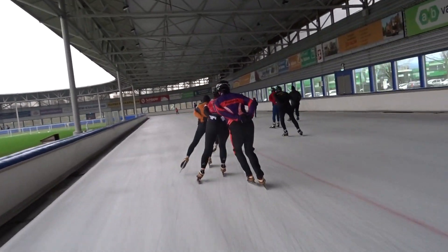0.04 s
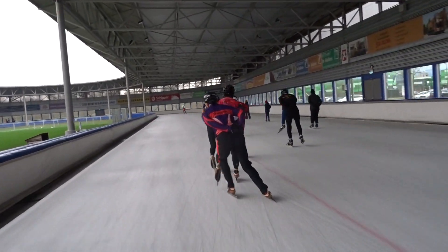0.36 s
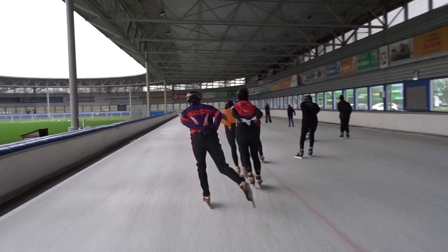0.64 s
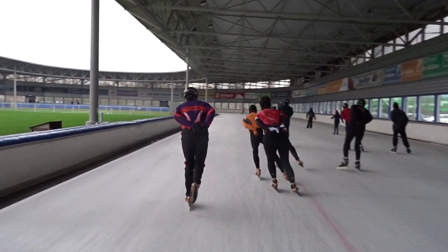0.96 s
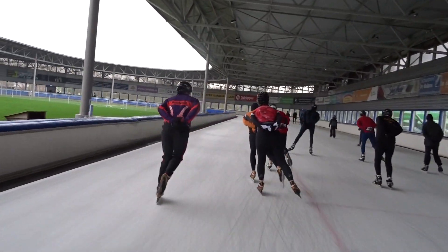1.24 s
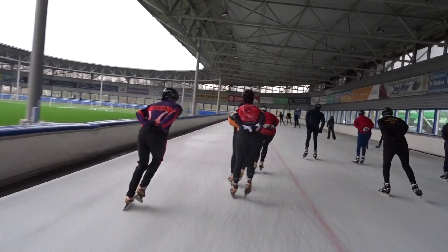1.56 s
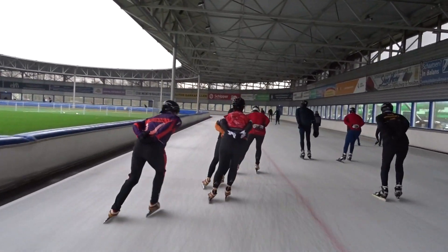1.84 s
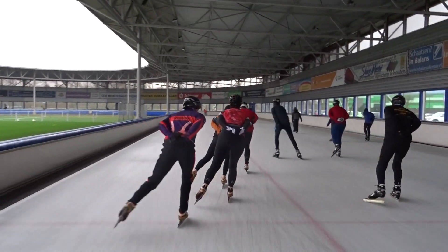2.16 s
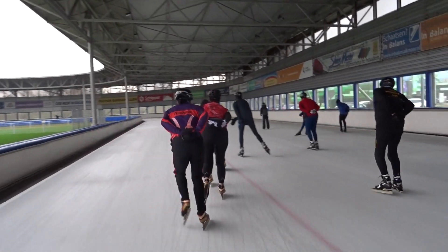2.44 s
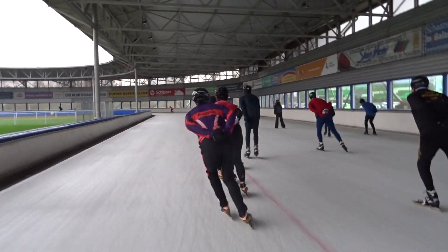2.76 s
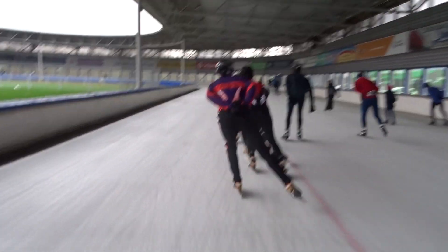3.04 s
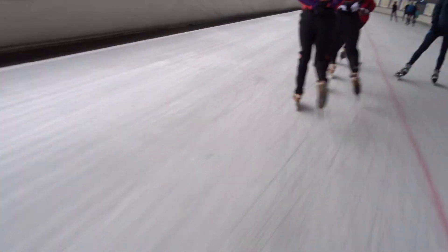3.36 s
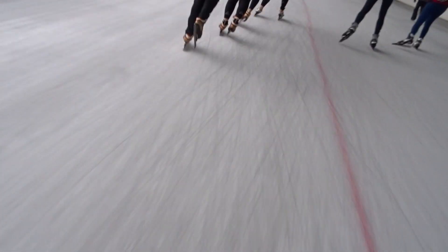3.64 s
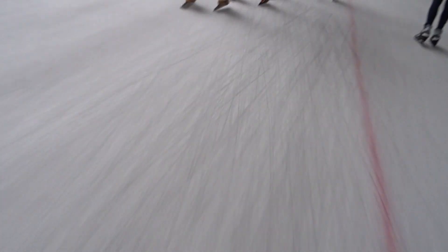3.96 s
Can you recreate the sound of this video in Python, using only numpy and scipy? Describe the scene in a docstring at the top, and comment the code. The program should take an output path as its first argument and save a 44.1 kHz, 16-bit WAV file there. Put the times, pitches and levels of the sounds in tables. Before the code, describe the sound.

Ice skate blades clack and scrape with each stride under rumbling head wind.

```python
"""A roofed ice track: speed skaters stride along, followed by a skater with a camera.
About once a second a steel blade clacks down, rings faintly off the barrier and roof, and
scrapes into its glide; edges rasp, spray and chip the ice. Head wind rumbles, flutters and
crackles on the two microphone ports, then eases and turns gusty as the camera tips down."""
import sys
import numpy as np
from scipy import signal
from scipy.fft import rfft, irfft
from scipy.io import wavfile

SR = 44100
rng = np.random.default_rng(int(sys.argv[2]) if len(sys.argv) > 2 else 0)


def int16_out(signal):
    """Quantize to a 16-bit WAV file."""
    q = np.round(np.clip(np.atleast_2d(signal).T, -1, 1) * 32767)
    wavfile.write(sys.argv[1], SR, q.astype(np.int16))


N = 176400
TIME_S, FREQ_HZ = np.arange(N) / SR, np.fft.rfftfreq(N, 1 / SR)


def amp(db):
    """Decibels to gain."""
    return 10 ** (np.asarray(db) / 20)


def unit(x):
    """Scales to rms 1."""
    return x / np.sqrt(np.mean(x ** 2) + 1e-20)


def curve_at(points, hz):
    """Reads a curve on a log-frequency axis."""
    f, value = np.transpose(points)
    return np.interp(np.log(hz + 1), np.log(f + 1), value)


def fader(points):
    """A level ride as a gain per sample."""
    return amp(np.interp(TIME_S, *np.transpose(points)))


def wobble(rate_hz):
    """Random movement of rms 1, from about 10 Hz up to the given rate."""
    band = FREQ_HZ / (FREQ_HZ + 10) / np.sqrt(1 + (FREQ_HZ / rate_hz) ** 4)
    return unit(irfft(rfft(rng.standard_normal(N)) * band, N))


def tilt(f, db_per_octave):
    """Brightens or dulls the treble above 2 kHz."""
    return amp(db_per_octave * np.log2(np.maximum(f, 2000) / 2000))


def stroke(start_s, hold_s, release_s, attack_s=0.0021):
    """Envelope of a blade stroke: quick attack, hold, exponential release."""
    t = TIME_S - start_s
    return np.clip(t / attack_s, 0, 1) * np.exp(-np.maximum(t - hold_s, 0) / release_s)


# How alike the two ports sound: freq_hz, correlation
PORT_LIKENESS = [(70, .96), (170, .86), (420, .66), (1000, .88), (10000, .97)]

def rush(eq, swing_db, brightness=0):
    """Stereo noise bed of rms 1, swung in level and then shaped by an EQ."""
    mid, side = rfft(rng.standard_normal((2, N)) * amp(swing_db))
    likeness = np.clip(curve_at(PORT_LIKENESS, FREQ_HZ), 0, 1)
    mid, side = mid * np.sqrt(1 + likeness), side * np.sqrt(1 - likeness)
    colour = amp(curve_at(eq, FREQ_HZ)) * tilt(FREQ_HZ, brightness)
    return unit(irfft(np.array([mid + side, mid - side]) * colour, N))


# Rides for the wind below its flutter, the roar within it, and the flutter: time_s, gain_db
WIND_RIDE = [(0, -17.5), (2.75, -17.5), (3.19, -21), (3.36, -15.5), (3.43, -30), (3.48, -21), (3.6, -20),
             (3.67, -25), (3.75, -25), (3.82, -17), (3.875, -24.5), (3.91, -22), (3.965, -34), (4, -18)]
ROAR_RIDE = [(0, -8), (1.3, -7.5), (1.7, -11.5), (1.88, -6), (2.15, -23), (2.45, -7), (2.75, -5), (3.1, -5),
             (3.36, -16.5), (3.55, -3.5), (4, -14)]
FLUTTER_RIDE = [(0, -36), (.8, -34), (.985, -36), (1.05, -35), (1.36, -34.5), (1.48, -38.5), (1.8, -39),
                (1.92, -36.5), (2.12, -42), (2.2, -34), (2.36, -37.5), (2.41, -50), (2.51, -53),
                (2.57, -37), (3.03, -33), (3.17, -38), (3.28, -37.5), (3.42, -45.5), (3.56, -39),
                (3.7, -44.5), (4, -47)]
# Low swells of buffeting, one per stride: peak_s, half_width_s, boost_db
STRIDE_SWELLS = [(.85, 0.3, 4), (1.24, 0.021, 8.5), (2.18, 0.084, 8), (3.21, 0.083, 10.5)]
# Tone of the four wind layers, low to high: freq_hz, gain_db
RUMBLE_EQ = [(10, -35), (28, -13), (80, 0.5), (130, 2), (400, -47), (2000, -80)]
BODY_EQ = [(30, -31), (90, -12.5), (160, -1), (330, -2), (550, -4.5), (1100, -18.5), (2500, -46.5),
           (9000, -90)]
ROAR_EQ = [(250, -22), (650, 1.5), (1000, -1), (1700, -18), (9000, -77)]
FLUTTER_EQ = [(300, -27), (1000, 7), (1600, 5), (2600, -1.5), (5000, -19.5), (8500, -39), (15000, -44)]

def head_wind():
    """Eddies buffet the ports; the same eddies roar and tear into a fluttering top."""
    eddies = wobble(rate_hz=45)
    swell_db = sum(db * np.exp(-((TIME_S - s) / width) ** 2) for s, width, db in STRIDE_SWELLS)
    rumble = amp(-12.5 + swell_db) * rush(RUMBLE_EQ, swing_db=0)
    body = amp(-0.04) * rush(BODY_EQ, swing_db=0.5 * eddies)
    roar = fader(ROAR_RIDE) * rush(ROAR_EQ, swing_db=2.1 * eddies)
    tearing_db = 3.5 * np.minimum(eddies, .5) + 3 * wobble(rate_hz=1200)
    flutter = amp(5) * rush(FLUTTER_EQ, tearing_db)
    return fader(WIND_RIDE) * (rumble + body + roar) + fader(FLUTTER_RIDE) * flutter


# Gritty upper mids, shared by crackle, rasps and ice chips: freq_hz, gain_db
GRIT_EQ = [(500, -42), (1400, -6), (3100, -1.5), (6000, -13), (7500, -24.5), (15000, -45)]

def wind_crackle(level_db=-49, ticks_per_s=350, spread_db=8.5):
    """Small sharp ticks ride on the wind's flutter and die away faster than it does."""
    size = amp(spread_db * np.minimum(rng.exponential(1, N), 3))
    polarity = np.sign(rng.standard_normal(N))
    ticks = size * polarity * (rng.random(N) < ticks_per_s / SR)
    grit = irfft(rfft(ticks) * amp(curve_at(GRIT_EQ, FREQ_HZ)), N)
    return amp(level_db) * unit(fader(FLUTTER_RIDE) ** 2 * grit)


# Ride of the glide hiss: time_s, level_db
GLIDE_RIDE = [(0, -50), (1.1, -54.5), (2.5, -56.5), (3.1, -52.5), (4, -46)]
# Tone of the glide: freq_hz, gain_db
GLIDE_EQ = [(400, -21), (2500, 7.5), (4500, -3), (7500, -3), (10600, -2), (12300, -15.5), (16000, -28)]

def glide():
    """Blades running over the ice leave a thin, grainy hiss."""
    return fader(GLIDE_RIDE) * rush(GLIDE_EQ, swing_db=2.5 * wobble(rate_hz=73))


# Short rasps: start_s, hold_s, level_db, brightness_db_per_octave
RASP_CUES = [(0.177, 0.021, -35.5, -5), (0.454, 0.051, -33.5, -11), (0.56, 0.058, -36, -2),
             (0.856, 0.07, -39, 2), (1.006, 0.04, -33, -5.5), (1.1, 0.092, -36, -5.5),
             (1.851, 0.039, -33.5, -8), (2.637, 0.076, -45, 6), (2.94, 0.04, -39, 4)]

def rasps(release_s=0.0033):
    """Bursts of coarse grit poke through the wind and cut off sharply."""
    grit_db = 3.5 * wobble(rate_hz=280)
    return sum(amp(db) * stroke(start, hold, release_s) * rush(GRIT_EQ, grit_db, brightness)
               for start, hold, db, brightness in RASP_CUES)


# Blade hits, levelled on their first 10 ms: start_s, level_db, brightness_db_per_octave
CLACK_CUES = [(0.207, -22.5, 0), (0.215, -44, 5), (0.2392, -32, 2.5), (0.2862, -42, 6), (0.819, -38, -2),
              (1.2207, -31, 1.5), (1.2502, -37.5, 4.5), (2.166, -27.5, 2), (2.1747, -38.5, 11),
              (2.198, -36, 4), (3.2156, -27.5, 4), (3.228, -44, 5), (3.249, -28.5, 1), (3.377, -36.5, 5),
              (3.6164, -38.5, 0.5)]
# Ring of blade and hinge: pitch_hz, gain_db, t60_s
BLADE_MODES = [(2180, -8, 0.035), (2694, 7, 0.038), (6840, 5, 0.016), (7500, 4, 0.015), (8900, -5, 0.024),
               (9790, 0.5, 0.031), (10500, 6, 0.011), (11270, -0.5, 0.017)]
# Tone of the bare contact: freq_hz, gain_db
TICK_EQ = [(1000, 25), (11000, -0.5), (13000, -5), (16000, -20)]

def blade_clacks(rise_s=0.00093, contact_decay_s=.002, chatter_decay_s=0.007, mode_spread_db=1.5):
    """A hard contact rings the steel, a little differently each time, and a short chatter follows."""
    out, t = np.zeros(N), np.arange(4096) / SR
    f = np.fft.rfftfreq(len(t), 1 / SR)
    ten_ms = SR // 100
    for start, db, brightness in CLACK_CUES:
        ring = np.zeros(len(t))
        for hz, mode_db, t60 in BLADE_MODES:
            decay = amp(mode_db + mode_spread_db * rng.standard_normal() - 60 * t / t60)
            ring += decay * np.sin(2 * np.pi * (hz * t + rng.random()))
        contact = rng.standard_normal(len(t)) * np.exp(-t / contact_decay_s)
        slips = rng.standard_normal(len(t)) * np.exp(-t / chatter_decay_s)
        chatter = amp(-9) * unit(signal.fftconvolve(slips, ring)[:len(t)])
        tick_spectrum = amp(-7 + curve_at(TICK_EQ, f)) * rfft(unit(contact))
        spectrum = (rfft(unit(ring) + chatter) + tick_spectrum) * tilt(f, brightness)
        attack = 1 - np.exp(-t / rise_s)
        hit = (irfft(spectrum) * attack)[:-ten_ms]  # trim the EQ's wrapped pre-ring
        place(out, start, amp(db) * hit / np.std(hit[:ten_ms]))
    return out


def place(mix, start_s, sound):
    """Drops a one-shot into the mix."""
    part = mix[..., max(round(start_s * SR), 0):][..., :sound.shape[-1]]
    part += sound[..., :part.shape[-1]]


def hall(sound, t60_s=0.66):
    """The barrier and the roof return a short stereo tail."""
    t = np.arange(SR // 2) / SR
    centre, width = rng.standard_normal(len(t)), .5 * rng.standard_normal((2, len(t)))
    tail = (centre + width) * amp(-60 * t / t60_s)
    return signal.fftconvolve(sound[None], tail / np.linalg.norm(tail[0]), axes=1)[:, :N]


# Blade scrapes: start_s, hold_s, level_db, release_s, brightness_db_per_octave
SCRAPE_CUES = [(0.24, 0.074, -48.5, 0.06, -2), (0.56, .05, -57, .04, 6), (1.26, 0.064, -40, 0.11, -8.5),
               (1.82, 0.095, -53.5, .02, -3), (2.01, 0.17, -53.5, 0.045, -3), (2.19, 0.018, -44, 0.33, -9),
               (2.72, 0.15, -52.5, .04, -4), (3.245, .1, -44, 0.032, -7.5),
               (3.397, 0.089, -44.5, .03, -11.5), (3.445, 0.096, -42, 0.0086, -5.5)]
# Tone of steel on ice: freq_hz, gain_db
SCRAPE_EQ = [(500, -36), (2500, -2.5), (4500, -5.5), (6300, -3), (6900, -0.5), (7500, -2), (8200, -1),
             (9800, 6.5), (11300, 3.5), (12200, -4), (16000, -26)]

def blade_scrapes(grain_db):
    """Each landing blade shaves the ice, then settles into the glide."""
    return sum(amp(db) * stroke(start, hold, release) * rush(SCRAPE_EQ, grain_db, brightness)
               for start, hold, db, release, brightness in SCRAPE_CUES)


# Puffs of sprayed ice: start_s, hold_s, level_db, release_s
SPRAY_CUES = [(1.305, .02, -54, .03), (3.33, 0.016, -50, 0.025), (3.376, .06, -51, .06),
              (3.495, 0.025, -46, 0.012)]
# Airy top of the spray: freq_hz, gain_db
SPRAY_EQ = [(5000, -23), (11000, 0), (13200, 0), (14300, -6), (16000, -3)]

def ice_spray(grain_db):
    """Shaved ice flies off the blade with a high sizzle."""
    puffs = sum(amp(db) * stroke(start, hold, release) for start, hold, db, release in SPRAY_CUES)
    return puffs * rush(SPRAY_EQ, grain_db)


# Ice snapping under an edge: start_s, peak_level_db, brightness_db_per_octave
CHIP_CUES = [(2.5612, -33.5, -1), (2.61, -32, 2.5), (2.6937, -31, 5), (3.183, -26.5, -14),
             (3.196, -26.5, -14), (3.7727, -27.5, -12), (3.7825, -26, -16)]

def ice_chips(rise_s=0.0014):
    """An edge bites and chips the ice: a snap of grit that is gone in a few milliseconds."""
    out, t = np.zeros(N), np.arange(2048) / SR
    f = np.fft.rfftfreq(len(t), 1 / SR)
    snap = t / rise_s * np.exp(1 - t / rise_s)
    for start, db, brightness in CHIP_CUES:
        phases = np.exp(2j * np.pi * rng.random(len(f)))
        grit = irfft(phases * amp(curve_at(GRIT_EQ, f)) * tilt(f, brightness))
        place(out, start, amp(db) * unit(grit) * snap)
    return out


def scene(hall_send_db=-15.5):
    """Skates under the head wind; only the clacks feed the hall."""
    clacks = blade_clacks()
    mix = head_wind() + wind_crackle() + ice_chips() + glide()
    grain_db = 2.5 * wobble(rate_hz=73)  # scrape and spray share one texture
    mix += blade_scrapes(grain_db) + ice_spray(grain_db) + rasps()
    return mix + clacks + amp(hall_send_db) * hall(clacks)


# Phase between the ports: freq_hz, left_lead_rad
PORT_PHASE = [(200, -0.11), (700, -1.15), (1100, -1.25), (2700, -0.71), (7000, -0.083)]
# Balance between the ports: freq_hz, left_minus_right_db
PORT_BALANCE = [(250, -0.41), (2700, 2), (8500, -2.2), (12000, -0.75)]

def record(dry, high_cut_hz=15750):
    """The two ports differ in phase and level; a steep high cut takes off the very top."""
    left = np.exp(.5j * curve_at(PORT_PHASE, FREQ_HZ)) * amp(curve_at(PORT_BALANCE, FREQ_HZ) / 2)
    pair = irfft(rfft(dry) * np.array([left, 1 / left]), N)
    high_cut = signal.firwin(511, high_cut_hz, window=("kaiser", 9), fs=SR)
    return signal.oaconvolve(pair, high_cut[None], "same")


dry = scene()
out = record(dry)
int16_out(out)
```